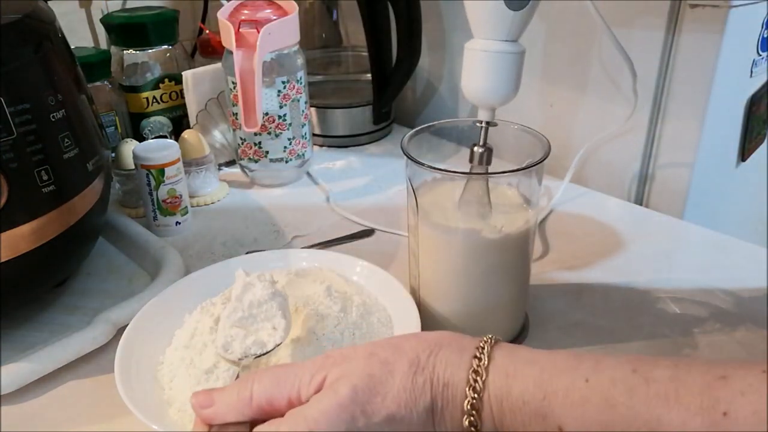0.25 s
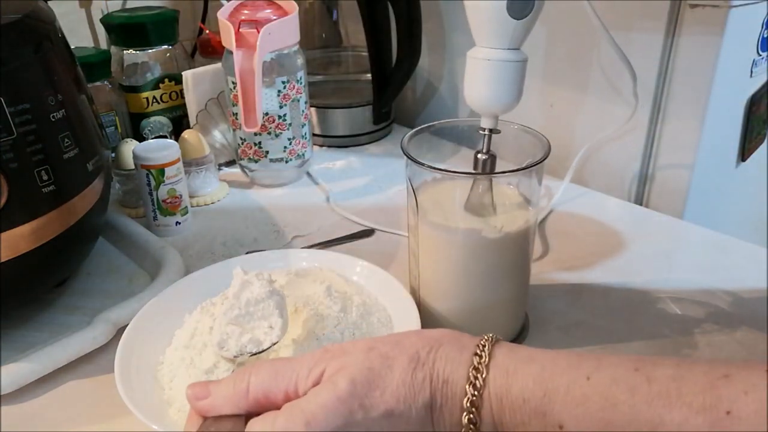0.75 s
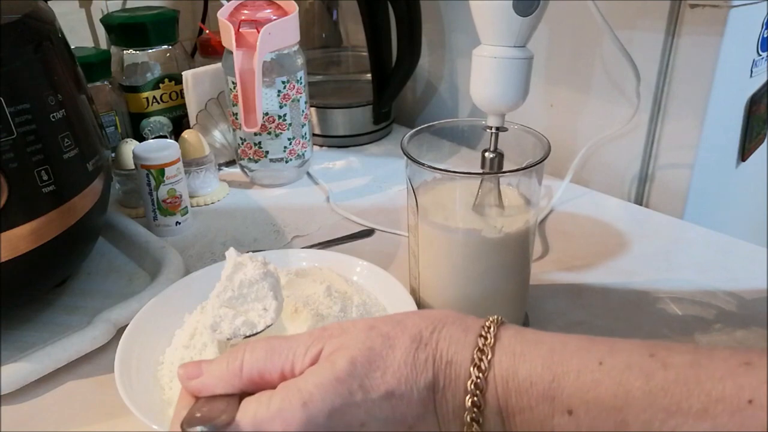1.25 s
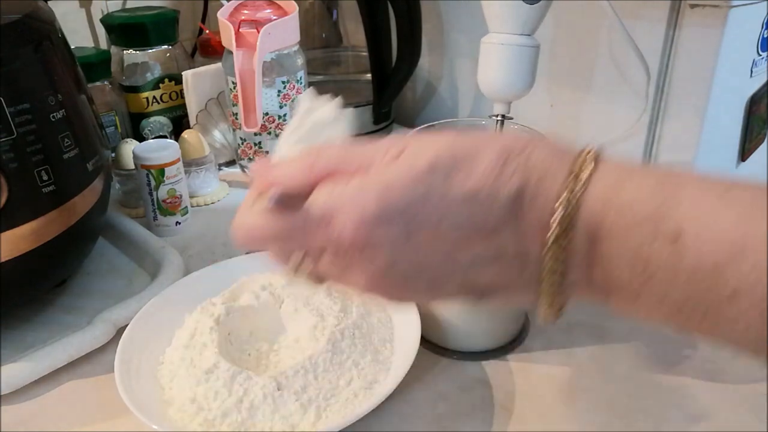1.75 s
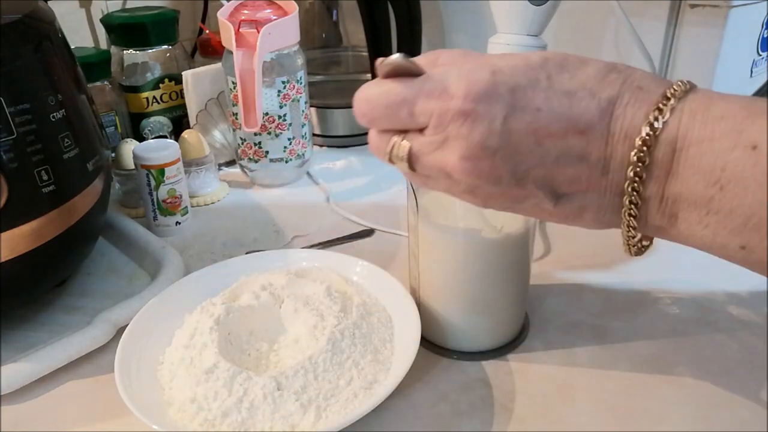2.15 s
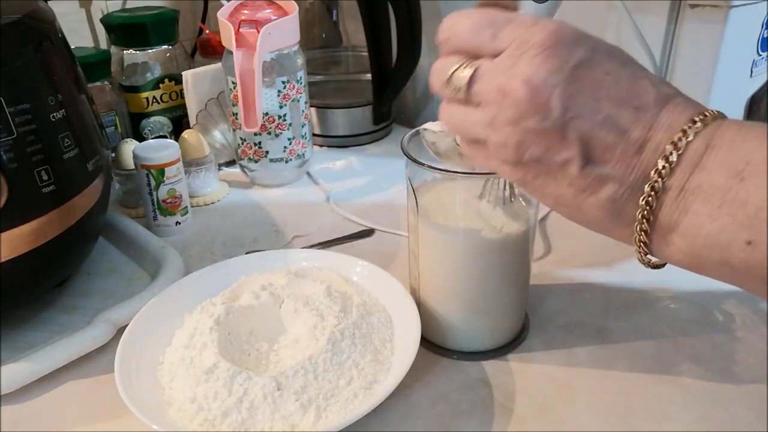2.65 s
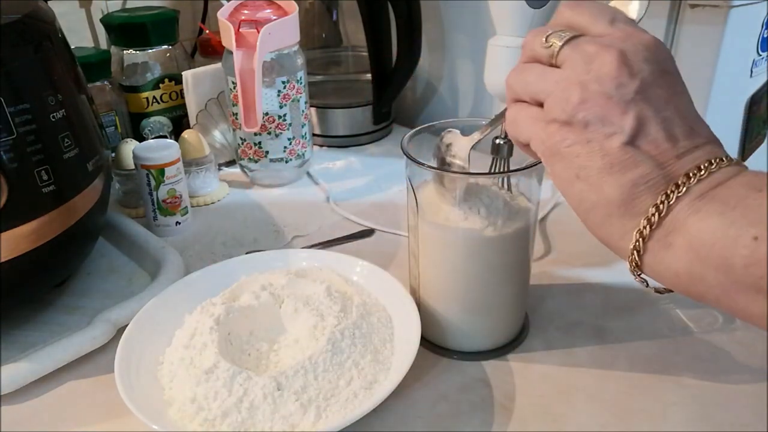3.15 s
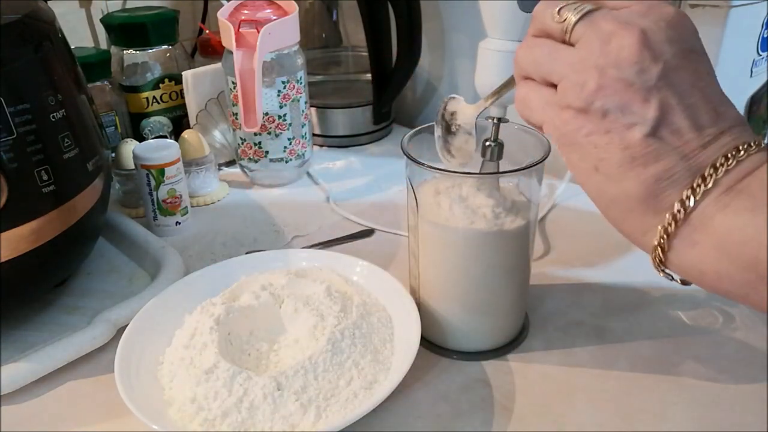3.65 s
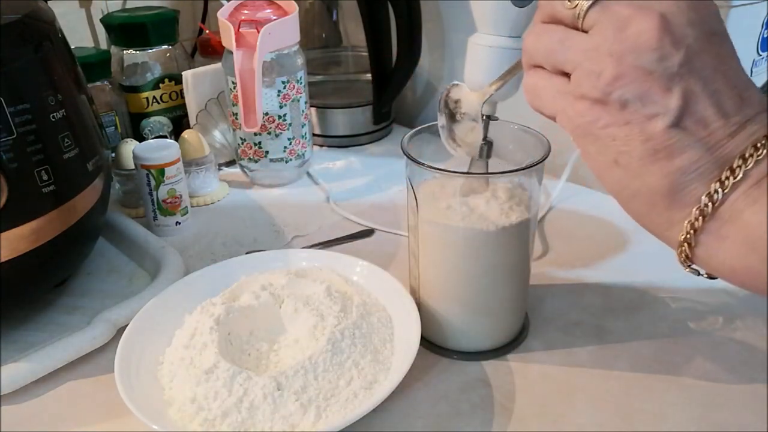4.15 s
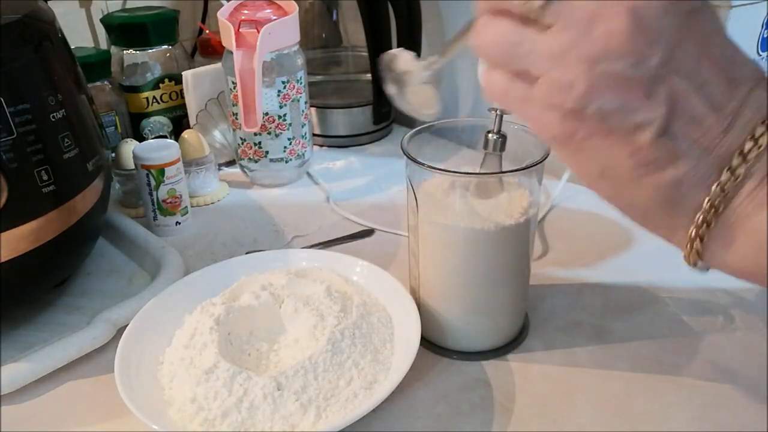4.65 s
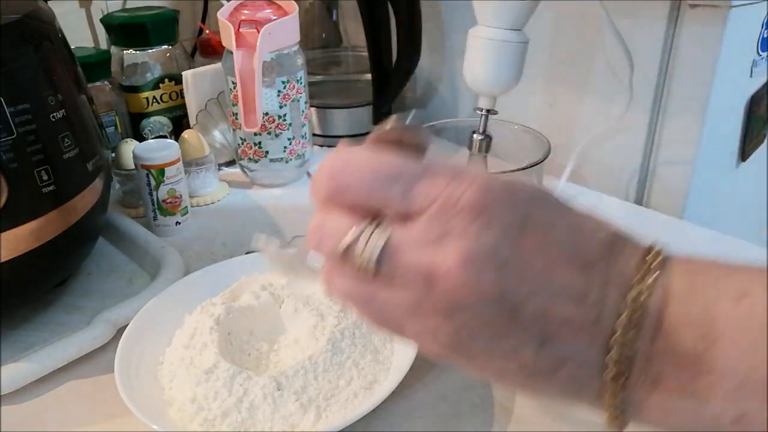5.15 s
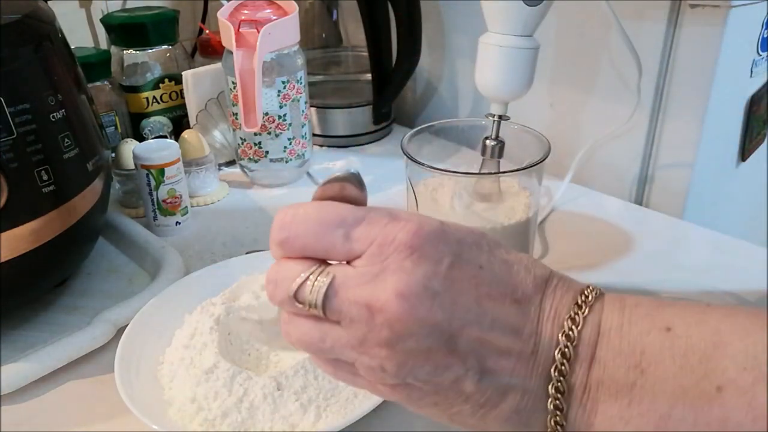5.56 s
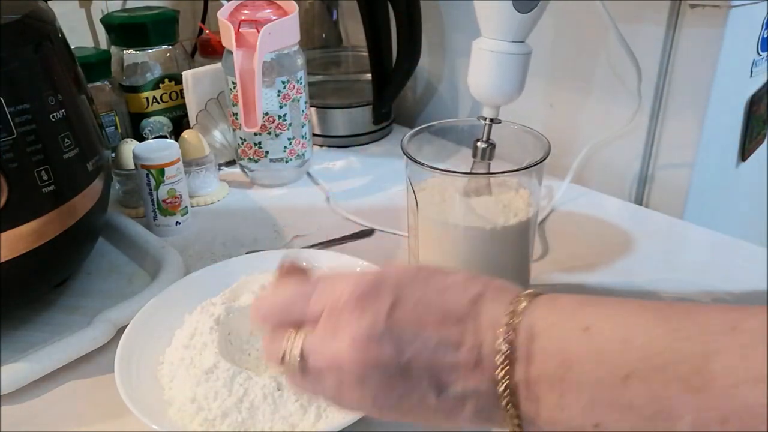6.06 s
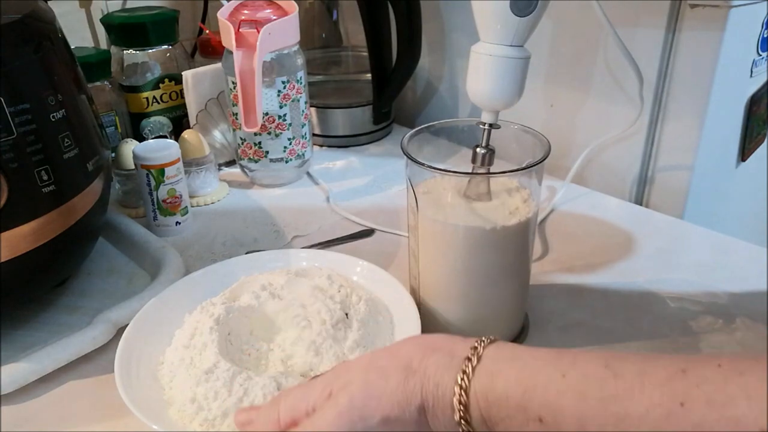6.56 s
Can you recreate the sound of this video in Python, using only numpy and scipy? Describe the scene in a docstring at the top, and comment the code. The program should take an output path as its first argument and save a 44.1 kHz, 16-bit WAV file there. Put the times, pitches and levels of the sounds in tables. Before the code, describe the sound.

A hand blender with a geared whisk starts abruptly in a beaker of batter, rattling and hissing for under a second, then coasts down to silence. A refrigerator hums low and unsteadily in the pause, with two tiny dry flour rustles. The blender then starts again and runs until the end, slightly lighter after its first moments. Close stereo microphone, small hard-walled kitchen.

```python
"""In a tiled kitchen a hand blender with a geared whisk works in a beaker of batter: a short burst that
coasts down, a pause, then a long run to the end. Gear teeth rattle and brushes hiss as trains of random
impacts, coloured by the plastic housing; the batter churns as low noise, and the walls answer with a
decaying noise tail. A refrigerator hums in swaying sine tones over soft air noise; in the pause
a spoonful of flour rustles twice, as swelling and fading grainy noise."""
import sys
import numpy as np
from scipy import signal
from scipy.fft import rfft, irfft, next_fast_len
from scipy.io import wavfile
from scipy.ndimage import uniform_filter1d, map_coordinates

SR = 44100
rng = np.random.default_rng(int(sys.argv[2]) if len(sys.argv) > 2 else 0)


def materialize(psi):
    """Save the field psi as 16-bit PCM at rate SR to the path in sys.argv[1].

    A 1-D psi becomes a single channel; in a 2-D psi each row is a channel.
    """
    bounded = np.clip(np.atleast_2d(psi).T, -1, 1)
    quanta = np.round(bounded * 32767).astype(np.int16)
    wavfile.write(sys.argv[1], SR, quanta)


N = 299880


def amp(db):
    """Decibels to gain."""
    return 10 ** (np.asarray(db) / 20)


def unit(x):
    """x at rms 1."""
    return x / np.sqrt(np.mean(x ** 2) + 1e-20)


def along(points, hz):
    """Columns of (Hz, value, ..) points read on a log frequency axis."""
    f, *columns = np.transpose(points)
    return np.squeeze([np.interp(np.log(hz + 1), np.log(f + 1), c) for c in columns])


def curves(rows):
    """One value per sample for each column after the time."""
    s, *columns = np.transpose(rows)
    t = np.arange(N) / SR
    return [np.interp(t, s, c) for c in columns]


def wobble(rate):
    """A smooth random curve, rate knots a second."""
    knots = rng.standard_normal(int(N * rate / SR) + 4)
    return map_coordinates(knots, [np.arange(N) * rate / SR])


def filtered(x, response):
    """x shaped by a complex response of frequency."""
    m = next_fast_len(N + SR // 2)
    spectrum = rfft(x, m) * response(np.fft.rfftfreq(m, 1 / SR))
    return irfft(spectrum, m)[..., :N]


def contacts(spread_db):
    """Three streams of dense small impacts: noise whose samples differ widely in size."""
    sizes = amp(spread_db * rng.standard_normal((3, N)))
    return sizes * rng.standard_normal((3, N))


def in_stereo(streams, colour, power=lambda f: 1, lag_s=0):
    """Stereo of rms 1: one stream feeds both sides, the left later by the lag; each side adds its own."""
    side = np.array([[1], [-1]])

    def gain(f, own):
        left_db, right_db, shared = along(colour, f)
        shared = np.clip(shared, 0, 1)
        part = np.sqrt(1 - shared if own else shared)
        delay = np.exp(-1j * np.pi * f * lag_s * side)  # half the lag each way
        return amp([left_db, right_db]) * np.sqrt(power(f)) * part * delay

    common = filtered(streams[0], lambda f: gain(f, False))
    separate = filtered(streams[1:], lambda f: gain(f, True))
    return unit(common + separate)


COMPRESSOR_HZ = 49.43


def compressor(orders, sway_db):
    """Tones on multiples of the compressor's turn sway in level, and in phase on each side."""
    turn = 2 * np.pi * COMPRESSOR_HZ * np.arange(N) / SR
    drift = np.array([wobble(8), wobble(7), wobble(9)])
    tones = np.zeros((2, N))
    for multiple, db in orders:
        shift = rng.integers(N)  # each tone reads the drift from another place
        left, right, level = np.roll(drift, shift, axis=1)
        phase = multiple * turn + shift + 0.63 * np.array([left, right])
        tones += amp(db + 1.0 + sway_db * level) * np.sin(phase)
    return tones


# Refrigerator hum. Each row: multiple of the compressor turn, relative level in dB.
HUM_ORDERS = [(2, 0), (2.5, -6), (3, -9.5), (4, -13)]
# Faint refrigerator whines. Each row: multiple of the compressor turn, level in dB before trims.
WHINE_ORDERS = [(11, -85), (15, -74.5), (22, -86), (25, -85), (44, -99), (48, -91), (51.5, -86), (64, -91),
                (67, -92), (68.5, -96), (70, -91), (73, -91), (87, -100), (94, -91), (95, -90), (97, -94),
                (110, -88), (120, -100), (139.5, -104), (142.5, -89), (155, -95)]
# Refrigerator swells. Each row: time in seconds, thrum in dB, hum in dB, both before trims.
FRIDGE_LEVELS = [(0, -77.5, -75), (.3, -84, -73), (.57, -80, -66), (1.12, -71, -78), (1.6, -79, -81),
                 (1.68, -74, -66.5), (2.1, -68, -65.5), (2.8, -81, -79), (3.0, -86, -67), (3.45, -65, -73),
                 (3.65, -75, -75), (4.2, -86, -68.5), (4.43, -64, -72.5), (4.85, -71.5, -68),
                 (5.2, -77, -72), (5.57, -79.5, -65), (6.0, -70, -73.5), (6.72, -72, -64.5)]
# Colour of the air noise. Each row: frequency in Hz, left in dB, right in dB, shared part 0-1.
AIR_COLOUR = [(20, -1, -14, 0.33), (69.5, -6.5, -6, 0.51), (225, -12, -13, 0.33), (297, -7.5, -7, 0.56),
              (400, -10, -11.5, 0.48), (716, -8, -9, .35), (880, -11.5, -14.5, 0.11),
              (1280, -14, -17.5, 0.14), (1600, -16.5, -18.5, 0.051), (6460, -25, -26, .05),
              (9000, -28.5, -22, .05), (10860, -24.5, -30, .05), (11900, -43, -40, .05),
              (14500, -48, -47, .05)]
# Slow course of the low air noise. Each row: time in seconds, level in dB over the steady noise.
RUMBLE_LEVELS = [(0, 0.5), (1.1, 2), (1.55, 1), (1.7, 2), (2.3, 1), (3.6, -1.5), (4.9, 2), (5.7, -1),
                 (6.8, 1)]
AIR_DB, RUMBLE_HZ = -64, 1000  # air noise level; below this frequency it swells and ebbs


def room_tone():
    """Refrigerator thrum, hum and faint whines sit over broad air noise whose low part wavers."""
    thrum_db, hum_db = curves(FRIDGE_LEVELS)
    thrum = amp(thrum_db) * amp([[2.5], [-2.5]]) * compressor([(0.99, 0)], sway_db=2.5)
    hum = amp(hum_db) * amp([[1.5], [-1.5]]) * compressor(HUM_ORDERS, sway_db=3.0)
    whine = amp(0.5) * compressor(WHINE_ORDERS, sway_db=2.2)
    air = amp(AIR_DB) * in_stereo(rng.standard_normal((3, N)), AIR_COLOUR)
    low = filtered(air, lambda f: 1 / (1 + (f / RUMBLE_HZ) ** 4))
    low_gain = amp(curves(RUMBLE_LEVELS)[0] + 1.0 * wobble(5.08))
    return thrum + hum + whine + air + (low_gain - 1) * low


FULL_TURNS, KICK_TURNS = 285.5, 100  # motor turns a second: run-up target, and in the first instant
SPIN_UP_S, COAST_S = .09, .59  # time constant of the run-up; time from release to standstill
RELEASE_DB, RELEASE_S = -4.5, 0.045  # the teeth unload when the power goes: drop, time constant


def press(on_s, off_s):
    """One press runs the motor up, then lets it coast: turns a second, coasting share, release drop in dB."""
    t = np.arange(N) / SR
    released = np.clip(t - off_s, 0, None)
    coast = np.clip(1 - released / COAST_S, 0, 1) * (t >= on_s)
    since_on = np.clip(t - on_s, 0, None)
    run_up = FULL_TURNS - (FULL_TURNS - KICK_TURNS) * np.exp(-since_on / SPIN_UP_S)
    return run_up * coast, coast, RELEASE_DB * (1 - np.exp(-released / RELEASE_S))


# Throb of the drive. Each row: beats a motor turn, then log-gain depth in the rattle and in the hiss.
DRIVE_BEATS = [(1 / 36, 0.11, 0.075), (1 / 18, 0.075, 0.036), (1 / 12, 0.014, 0.019), (1 / 4, 0.059, 0.1),
               (16 / 36, 0.022, 0.046), (26 / 36, 0.013, 0.093), (0.99, 0.051, 0.091)]


def drive_throb(speed):
    """The turning shafts of the gear train pulse the gain of rattle and hiss."""
    turns = np.cumsum(speed) / SR
    beats, *depths = np.transpose(DRIVE_BEATS)
    phases = np.outer(beats, turns) + rng.random((len(beats), 1))
    return np.exp(np.array(depths) @ np.cos(2 * np.pi * phases))


# Housing resonances. Each row: centre in Hz, width in Hz, peak in dB over the broad sound.
HOUSING_MODES = [(405, 41, 5), (586, 28, 10.5), (717, 21, 4.5), (831, 18, -1.5), (977, 35, 4),
                 (1099, 4.7, 0), (1221, 16, 1.5), (1357, 49, 3), (1570, 49, -1.5), (1653, 47, 2),
                 (1826, 43, 3.5), (1918, 29, 5.5), (2040, 35, 2), (2082, 22, 8), (2323, 99, 2),
                 (2396, 50, -1), (2656, 33, 3), (2843, 37, 4), (3100, 22, -4.5), (3810, 51, 4),
                 (5360, 150, -0.5), (5680, 200, 3)]
LAG_S = 6 / 44100  # the blender reaches the left side this much later


def housing(f):
    """The plastic shell rings: summed power of its resonances over the broad sound."""
    return 1 + sum(amp(db) ** 2 / (1 + (2 * (f - c) / w) ** 2) for c, w, db in HOUSING_MODES)


def patchy(x, depth_db):
    """Random patches of gain in time and frequency make the rattle and hiss blotchy."""
    z = signal.stft(x, nperseg=512)[2]
    field = rng.standard_normal(z.shape[1:])
    field = uniform_filter1d(field, size=5, axis=0)  # smooth over frequency
    field = uniform_filter1d(field, size=7, axis=1)  # smooth over time
    return unit(signal.istft(z * amp(depth_db * unit(field)), nperseg=512)[1][:, :N])


# Colour of the gear rattle. Each row: frequency in Hz, left in dB, right in dB, shared part 0-1.
RATTLE_COLOUR = [(480, -34.5, -38, 0.23), (1093, -12.5, -12, 0.16), (1364, -3.5, -14, 0.82),
                 (1980, -2, -6, 0.52), (2270, -6.5, -5, 0.45), (2970, -5.5, -4.5, 0.5),
                 (3760, -11.5, -11, 0.34), (4290, -14, -13.5, 0.28), (7000, -40, -56, .3)]


def rattle(throb, speed):
    """Gear teeth strike in the housing; slower teeth strike more softly, so the treble fades first."""
    teeth = throb * amp(0.61 * wobble(60)) * contacts(spread_db=5)
    bright = patchy(in_stereo(teeth, RATTLE_COLOUR, housing, LAG_S), depth_db=1.1)
    dull = filtered(bright, lambda f: 1 / (1 + (f / 1800) ** 6))
    return dull + (speed / speed.max()) ** 0.083 * (bright - dull)


# Colour of the brush hiss. Each row: frequency in Hz, left in dB, right in dB, shared part 0-1.
HISS_COLOUR = [(2480, -42, -52, .3), (4010, -7.5, -12.5, 0.56), (4740, -5.5, -6.5, 0.16),
               (5870, 0, -1, .45), (6400, -9.5, -0.5, 0.27), (7220, -3, -4.5, 0.23), (7970, -16, -7.5, 1),
               (9270, -10, -5.5, 0.26), (10500, -7, -16.5, 0.042), (12030, -19.5, -23.5, .09),
               (13800, -31, -31, .09), (14800, -38, -39, .2)]


def hiss(throb):
    """Motor brushes scrape: dense high-pitched impacts that throb with the drive."""
    brushes = throb * amp(1.03 * wobble(90)) * contacts(spread_db=4.5)
    return patchy(in_stereo(brushes, HISS_COLOUR, housing, LAG_S), depth_db=1.5)


# Colour of the batter. Each row: frequency in Hz, left in dB, right in dB, shared part 0-1.
CHURN_COLOUR = [(149, -38, -36, 0.5), (220, -15.5, -12.5, 0.47), (297, -5, -4, 1), (526, -6, -3.5, 0.78),
                (874, 3.5, -3, 0.17), (1170, -12, -18, 0.7), (3000, -58, -65, .3)]


def churn():
    """Batter tumbles round the whisk: low uneven noise with a slow random swell."""
    batter = amp(0.98 * wobble(20)) * contacts(spread_db=5.0)
    return in_stereo(batter, CHURN_COLOUR, housing, LAG_S)


# Thumb on the switch. Each row: on in seconds, off in seconds, churn at the heaviest load in dB.
SWITCH_PRESSES = [(0.351, 1.001, -53), (3.656, 6.8, -51.5)]
# Load on the gears, one table a press. Each row: time in seconds, gear level in dB before release.
GEAR_LOADS = [
    [(0.351, -42), (0.381, -37), (0.469, -36), (0.653, -38.5), (0.689, -35), (1.01, -35)],
    [(3.657, -40), (3.685, -35), (3.8, -35), (4.2, -35.5), (4.26, -40), (5.02, -39.5), (5.07, -36.5),
     (5.12, -39.5), (6.8, -38.5)],
]
# Slow left-right balance of the rattle and hiss. Each row: time in seconds, left over right in dB.
STEREO_BALANCE = [(.35, -3), (1.0, -2.5), (1.3, .5), (3.66, 0.5), (4.8, 1.1), (5.6, -0.4), (6.8, -1)]
RATTLE_LAW, HISS_LAW, CHURN_LAW = 1.45, 1.9, 0.87  # coasting: amplitude goes as speed to this power
HISS_DB, CHURN_FOLLOWS = 0.27, 0.96  # hiss over the rattle; share of the load swings in the churn


def blender():
    """Motor speed and load drive the rattle, hiss and churn through each press."""
    presses = [press(on_s, off_s) for on_s, off_s, _ in SWITCH_PRESSES]
    speed = sum(turns for turns, _, _ in presses)
    rattle_throb, hiss_throb = drive_throb(speed)
    teeth, brushes, batter = rattle(rattle_throb, speed), hiss(hiss_throb), churn()
    balance = amp(np.outer([.5, -.5], curves(STEREO_BALANCE)[0]))
    sound = 0
    for (_, coast, release_db), rows, (*_, churn_db) in zip(presses, GEAR_LOADS, SWITCH_PRESSES):
        load_db, = curves(rows)
        gears = coast ** RATTLE_LAW * teeth + amp(HISS_DB) * coast ** HISS_LAW * brushes
        batter_db = churn_db + CHURN_FOLLOWS * (load_db - load_db.max())
        sound = sound + balance * amp(load_db + release_db) * gears
        sound = sound + amp(batter_db) * coast ** CHURN_LAW * batter
    return sound


# Gears taking up or losing load. Each row: start in seconds, initial level in dB before the band filter.
GEAR_KNOCKS = [(0.3517, -29), (0.9654, -30), (3.657, -42)]


def knocks():
    """Gears crack as they take up or lose load: very short noise bursts between 1.2 and 9 kHz."""
    cracks, t = np.zeros(N), np.arange(SR // 50) / SR
    for s, db in GEAR_KNOCKS:
        decay = amp(db - 60 * t / 0.0044)  # 60 dB down in 4.4 ms
        cracks[round(s * SR):][:len(t)] += decay * rng.standard_normal(len(t))
    band = signal.butter(4, [1200, 9000], "band", fs=SR, output="sos")
    return signal.sosfilt(band, cracks)


# Decay of the walls' answer. Each row: frequency in Hz, time to fall 60 dB in seconds.
KITCHEN_DECAY = [(300, 0.66), (2000, 0.16), (10000, 0.19)]


def kitchen(x):
    """Each frequency of the walls' answer dies at its own speed, with its own noise on each side."""
    hz, t, z = signal.stft(rng.standard_normal((2, SR // 3)), SR, nperseg=256)
    z = z * amp(-60 * t / along(KITCHEN_DECAY, hz)[:, None])
    z = z / np.linalg.norm(z, axis=2, keepdims=True)  # equal energy at every frequency
    tail = signal.istft(z, SR, nperseg=256)[1]
    both_sides = x[::-1] + x
    return signal.fftconvolve(both_sides, tail / np.linalg.norm(tail[0]), axes=1)[:, :N]


# Brief narrow tones. Each row: centre in seconds, pitch in Hz, level in dB before flutter, length in seconds.
BRIEF_TONES = [(1.076, 1520, -50, 0.025), (1.166, 609, -55, 0.025), (1.203, 3640, -59, 0.012),
               (1.242, 960, -54, 0.018), (1.29, 1530, -55, 0.017), (1.42, 1840, -69, 0.026),
               (1.457, 3660, -71, 0.069), (2.792, 2480, -70, 0.016), (2.79, 4450, -74, .015)]


def brief_tones():
    """Single sine tones swell briefly and flutter in level and phase, most of them as the whisk slows."""
    t, sound = np.arange(N) / SR, np.zeros(N)
    for s, hz, db, length in BRIEF_TONES:
        swell = amp(db + 4.9 * wobble(59.75)) * np.exp(-((t - s) / length) ** 2)
        sound += swell * np.sin(2 * np.pi * (hz * t + .25 * wobble(70)))
    return sound


# Slips of the flour. Each row: start in seconds, level in dB before attack and fade, fade in seconds.
FLOUR_SLIPS = [(1.745, -60, 0.029), (1.787, -58.5, 0.032), (2.74, -55, 0.028), (2.782, -64, .045)]
FLOUR_ATTACK_S = 0.0055


def flour():
    """Fine dry grains slip suddenly and trickle out: fast swells of uneven noise that fade."""
    t, swell = np.arange(N) / SR, np.zeros(N)
    for start, db, fade in FLOUR_SLIPS:
        since = np.clip(t - start, 0, None)
        swell += amp(db) * (1 - np.exp(-since / FLOUR_ATTACK_S)) * np.exp(-since / fade)
    # colour: Hz, left dB, right dB, shared part
    colour = [(500, -10, -10, .2), (1990, -2, -4, 0.17), (10000, -16, -13, .1), (14500, -26, -30, .1)]
    return swell * in_stereo(contacts(spread_db=7), colour)


def scene():
    """Blender in its kitchen, with the quiet sounds around it."""
    near = blender() + knocks() + brief_tones()
    return near + amp(-13.0) * kitchen(near) + room_tone() + flour()


TOP_HZ = 14980


def record(dry):
    """Nothing is kept above the band limit."""
    return filtered(dry, lambda hz: hz < TOP_HZ)


dry = scene()
out = record(dry)
materialize(out)
```